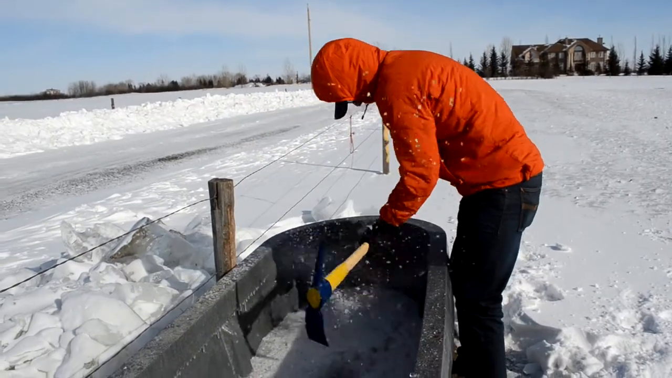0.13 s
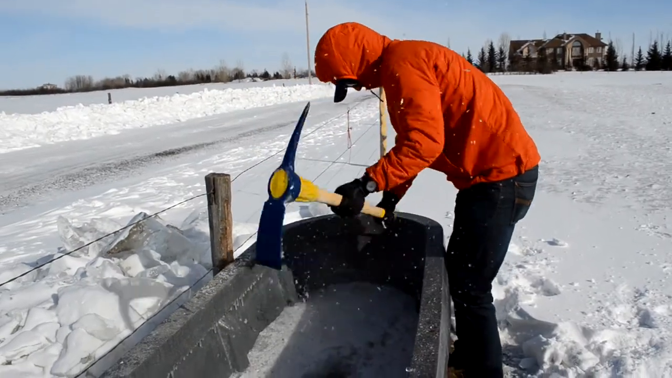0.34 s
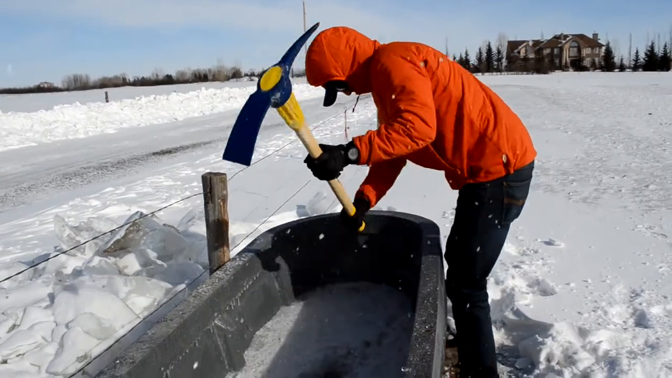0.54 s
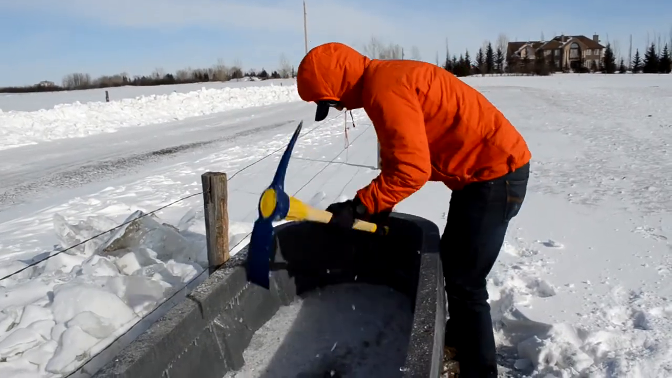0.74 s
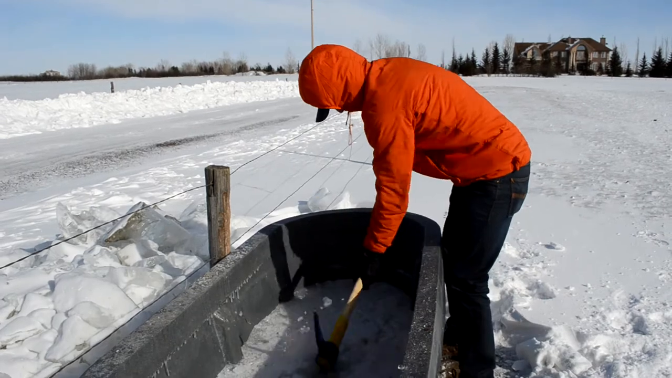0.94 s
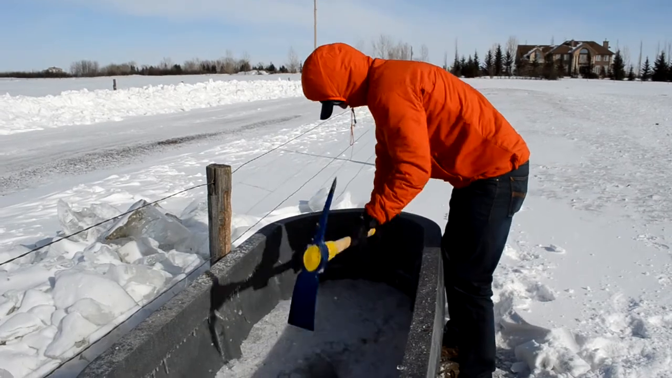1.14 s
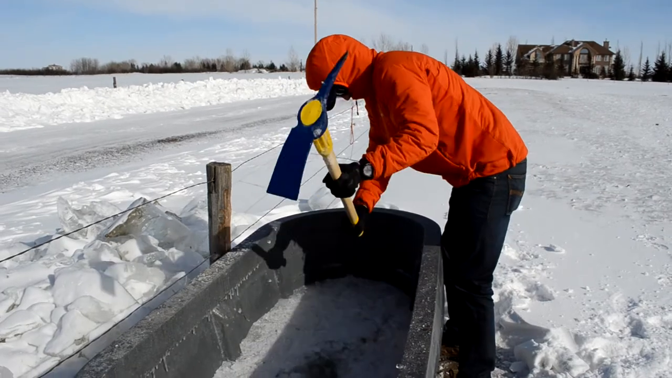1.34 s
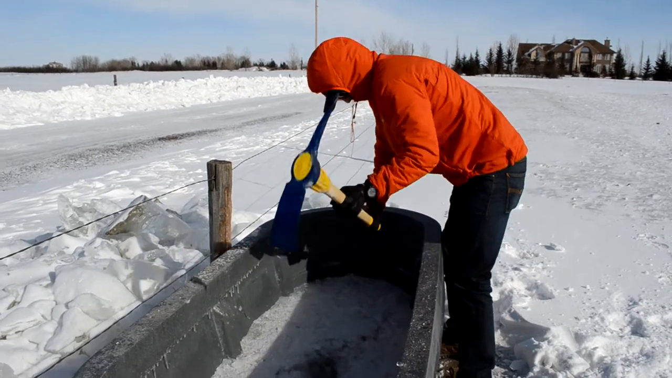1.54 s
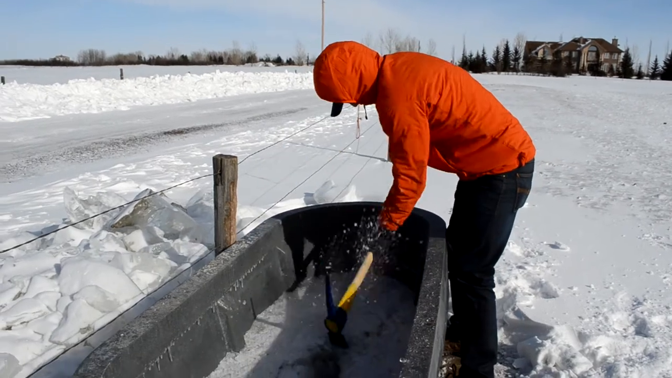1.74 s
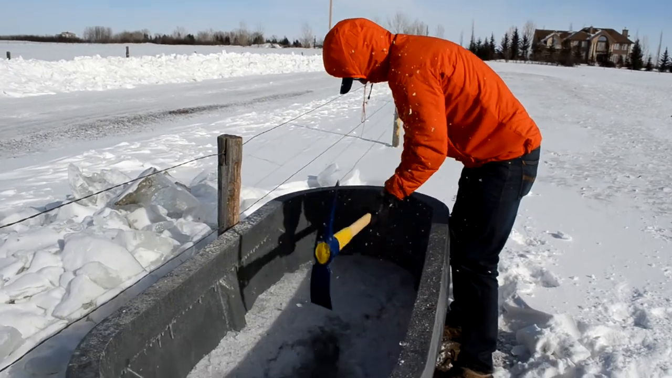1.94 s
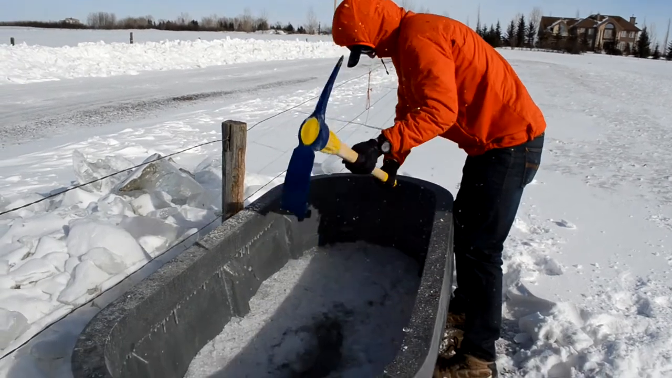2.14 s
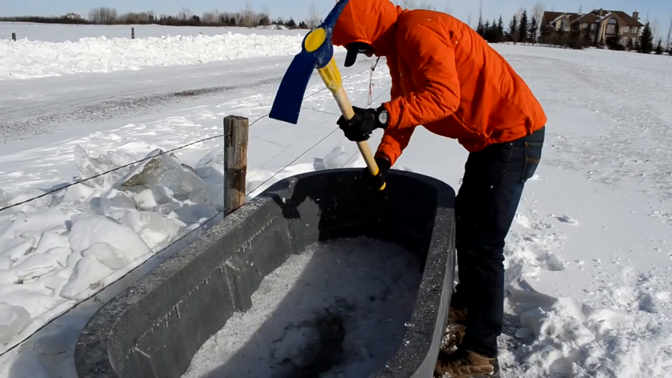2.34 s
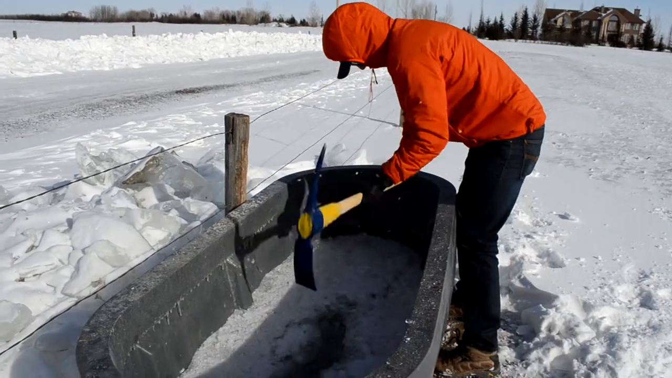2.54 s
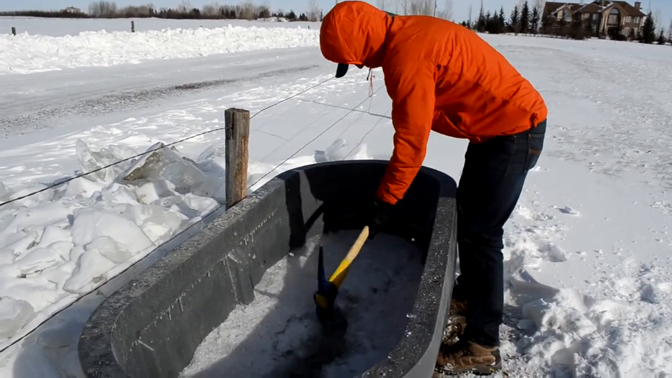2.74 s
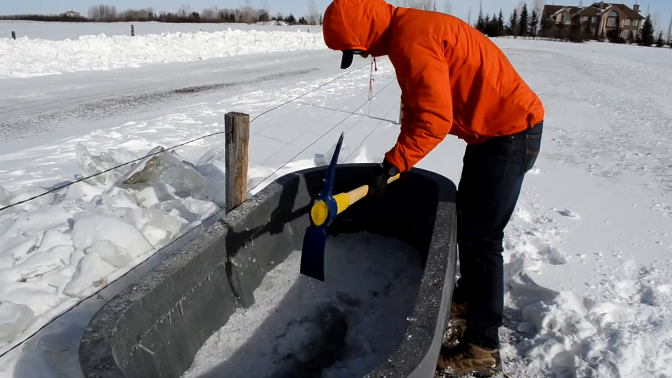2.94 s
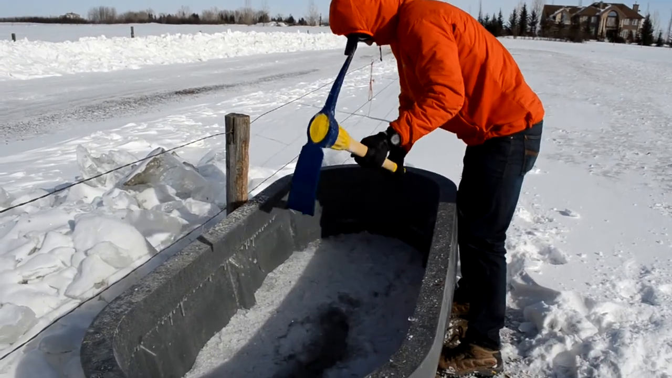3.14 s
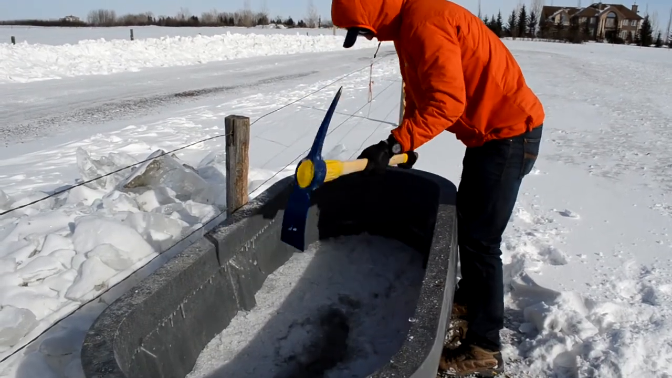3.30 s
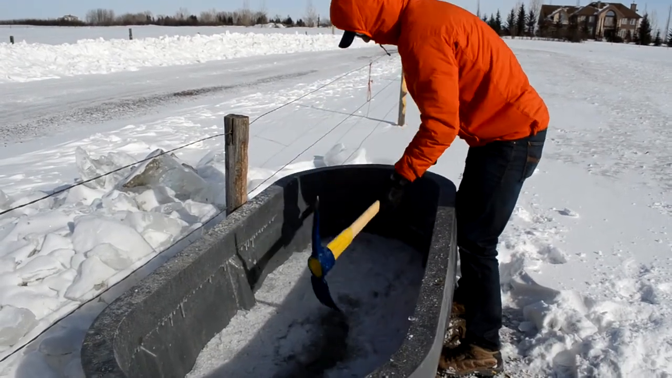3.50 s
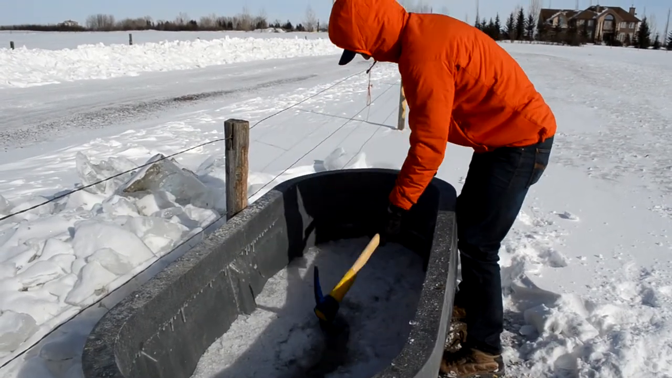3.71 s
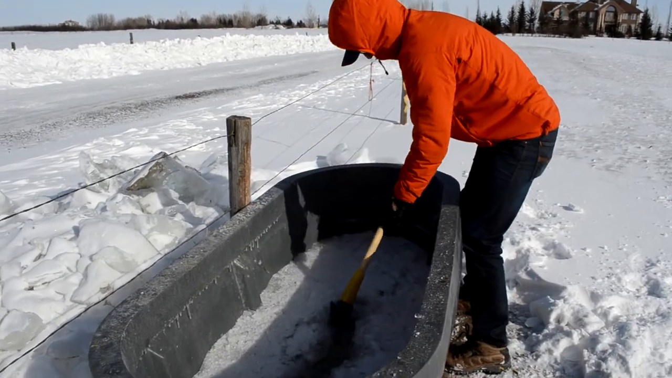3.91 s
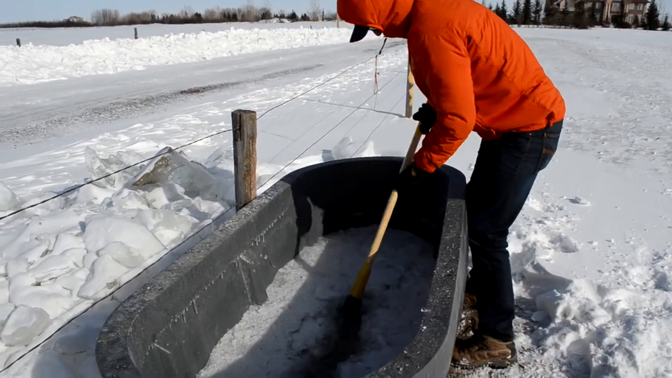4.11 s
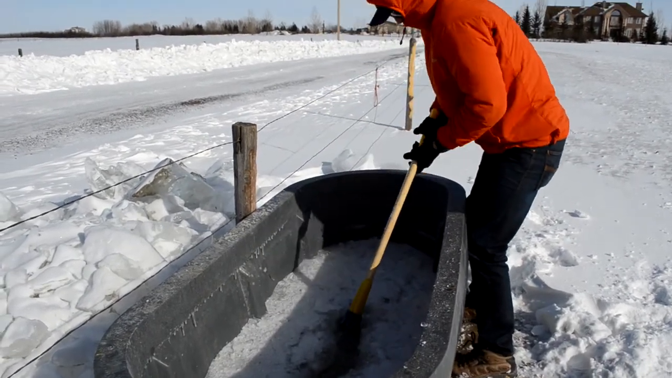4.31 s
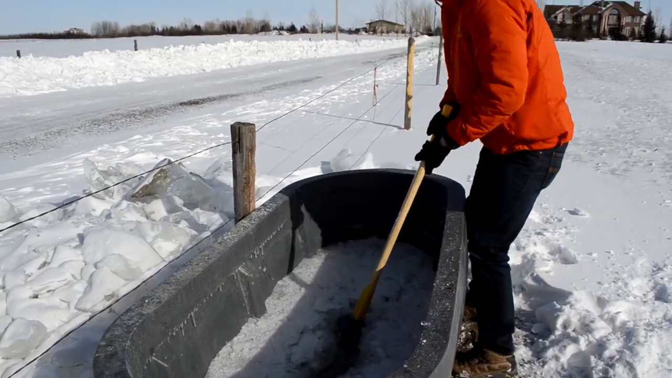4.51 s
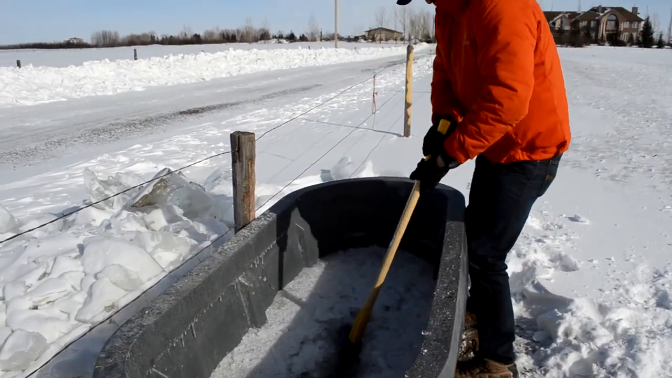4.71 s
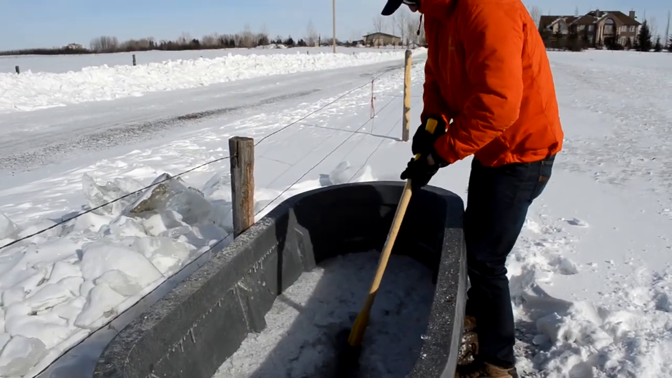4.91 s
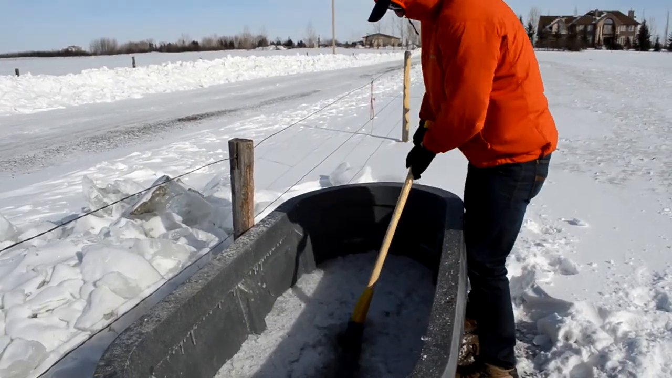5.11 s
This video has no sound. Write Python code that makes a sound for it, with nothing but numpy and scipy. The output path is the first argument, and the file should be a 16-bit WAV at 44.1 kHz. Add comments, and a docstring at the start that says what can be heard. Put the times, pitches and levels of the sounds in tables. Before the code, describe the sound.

A pickaxe cracks thick ice in a hollow plastic trough about once a second, chips scattering, then scrapes through rubble in buffeting wind.

```python
"""Chopping ice in a stock trough

A pickaxe chops thick ice in a plastic trough, outdoors in snow, two metres from the microphone.
Each blow is a run of tiny fractures that rings the slab, thumps the trough and echoes between its walls;
some also ring the steel head. Chunks knock about, chips and spray rain down as filtered bursts of noise,
and at the end the blade is dragged through the rubble with a soft swish, likely a nylon jacket sleeve.
Wind, as uneven low noise, buffets the microphone."""
import sys
import numpy as np
from scipy import signal
from scipy.fft import rfft, irfft
from scipy.io import wavfile

SR = 44100
rng = np.random.default_rng(int(sys.argv[2]) if len(sys.argv) > 2 else 0)


def persist_wave(psi):
    """Save psi, clipped to +-1, as 16-bit WAV."""
    counts = np.round(np.clip(psi, -1, 1) * 32767).astype(np.int16)
    wavfile.write(sys.argv[1], SR, np.atleast_2d(counts).T)


N = 231657
TIME = np.arange(N) / SR  # s, the whole scene
HIT_SIZE = 16384  # samples, the room given to one impact
AGE = np.arange(HIT_SIZE) / SR  # s since an impact

# Blows of the pick and the cracks that follow; levels are relative, slab to hollow and splinter to the crack,
# overtone to the slab: start_s, level_db, crushing_s, slab_hz, slab_db, overtone_db, thump_db, hollow_db,
# splinter_db
BLOWS = [(0.000, -23.5, 0.009, 1090, 3.5, -20, -8, -3, -4.5),
         (0.8932, -12.5, 0.0016, 1560, -5, -2, -10, 1, -5),
         (0.8982, -15, 0.0064, 1576, 8.5, -31, -7, 3, -20),
         (0.9447, -17.5, 0.00075, 1555, 7, -30, 6, 2.5, -28),
         (1.7231, -9, 0.0059, 1220, -2, 24, -11, 3.5, -5),
         (2.6519, -10, 0.0058, 1485, 1, -8.5, -19, 1.5, -11.5),
         (2.667, -21, 0.016, 1230, -9, -20, -11, 5.5, -32),
         (2.684, -11, 0.0005, 1385, 0, -9, -0.5, -1, -16.5),
         (3.648, -18.5, 0.011, 1265, 12.5, -25, 2, -25, -4.5)]
# Spectrum of splintering ice: frequency_hz, relative_level_db
SPLINTER_SPECTRUM = [(500, -36), (2000, 4), (3500, 11.5), (5500, 1), (7500, -3.5), (10000, -11.5),
                     (13000, -25), (16000, -14)]
# Spectrum of a small hard chip landing: frequency_hz, relative_level_db
CHIP_SPECTRUM = [(200, -17), (900, 2), (1800, 7.5), (4000, -9), (7500, -10), (11000, -23.5), (13000, -28),
                 (16000, -32)]
# Spectrum of the deep buffeting at the microphone: frequency_hz, relative_level_db
BUFFET_SPECTRUM = [(10, -46), (25, -22), (50, -3), (90, 1.5), (140, -4.5), (220, -13.5), (400, -44.5),
                   (1500, -66)]
# Spectrum of the higher flutter at the microphone: frequency_hz, relative_level_db
FLUTTER_SPECTRUM = [(50, -20), (130, 0), (200, 1.5), (290, -2.5), (420, -14), (700, -22), (2000, -39.5),
                    (8000, -77)]


def amp(db):
    """Decibels to gain."""
    return 10 ** (np.asarray(db) / 20)


def curves(table):
    """The columns of a control table, one value a sample."""
    s, *columns = np.transpose(table)
    return [np.interp(TIME, s, column) for column in columns]


def unit(x):
    """A steady sound at rms 1."""
    return x / np.sqrt(np.mean(x ** 2))


def unit_hit(x):
    """A short sound with the energy of 10 ms at rms 1."""
    return x / np.sqrt(np.sum(x ** 2) / (SR / 100))


def fade(t60):
    """Free decay by 60 dB in t60 seconds."""
    return np.exp(-np.log(1000) * AGE / max(t60, 1e-3))


def through(x, response):
    """A sound played through an impulse response."""
    return signal.fftconvolve(x, response)[:len(x)]


def colour(x, points, size=4096):
    """Causal, minimum-phase filter with the given spectrum."""
    hz, db = np.transpose(points)
    bins_hz = np.arange(size // 2 + 1) * SR / size
    log_gain = np.log(amp(np.interp(np.log(bins_hz + 1), np.log(hz), db)))
    cepstrum = irfft(log_gain)
    # folding the cepstrum forward puts the energy of the filter as early as it can be
    cepstrum[1:size // 2] *= 2
    cepstrum[size // 2 + 1:] = 0
    return through(x, irfft(np.exp(rfft(cepstrum))))


def ring(modes):
    """Impulse response of a set of damped modes."""
    return sum(amp(db) * fade(t60) * np.sin(2 * np.pi * hz * AGE) for hz, db, t60 in modes)


def fractures(size, rate, spread_db):
    """Tiny snaps at random moments, rate a second on average, their strengths spread unevenly."""
    strength = amp(spread_db * np.minimum(rng.exponential(size=size), 4))
    happens = rng.random(size) < rate / SR
    return happens * strength * rng.choice([-1, 1], size)


def crush(length, rise, release):
    """A run of fractures that builds up, lasts while the ice gives way and dies out."""
    push = (1 - np.exp(-AGE / rise)) * np.exp(-np.maximum(AGE - length, 0) / release)
    return push * fractures(HIT_SIZE, rate=9000, spread_db=2.0)


def hollow(force, t60):
    """Dense reflections between the trough walls, as a decaying tail of noise."""
    hollow_spectrum = [(80, -9.5), (250, -3), (400, -5.5), (520, -2), (690, 0), (1000, -7.5), (1500, -5.5),
                       (2100, -20), (2800, -21), (6000, -45), (16000, -64)]  # the hollow of the trough: frequency_hz, relative_level_db
    walls = rng.standard_normal(HIT_SIZE) * fade(t60)
    return unit_hit(colour(through(force, walls), hollow_spectrum))


def patter(rate, spread_db, t60):
    """Countless tiny impacts, each a short burst of noise."""
    energy = through(fractures(N, rate, spread_db) ** 2, fade(t60) ** 2)
    return unit(np.sqrt(np.abs(energy)) * rng.standard_normal(N))


def tumble(count, spread_db, cycles):
    """Small lumps knocking together at random, each a click of a few cycles at its own pitch."""
    lump_size = 768  # samples
    when, pitch, strength, turn = rng.random((count, 4)).T[:, :, None]
    hz = 300 * 20 ** pitch  # 300 to 6000 Hz
    gain = amp(-spread_db * np.log(np.maximum(strength, .03))) * hz
    turns = hz * AGE[:lump_size]
    decay = np.exp(-np.log(1000) * turns / cycles)  # 60 dB in this many cycles
    lumps = gain * decay * np.sin(2 * np.pi * turns) * np.sign(turn - .5)
    place = (when * N).astype(int) + np.arange(lump_size)
    return unit(np.bincount(place.ravel(), lumps.ravel(), N)[:N])


def swell(s, length, rise, release):
    """A movement that starts at s seconds, gathers speed, lasts for a while and comes to rest."""
    age = np.maximum(TIME - s, 0)
    return (1 - np.exp(-age / rise)) * np.exp(-np.maximum(age - length, 0) / release)


def surge(s, rise, release):
    """A spill that grows to its peak at s seconds and settles."""
    return np.exp(np.minimum((TIME - s) / rise, (s - TIME) / release))


def add(track, s, sound):
    """Mix a sound into the track at s seconds."""
    start = int(np.clip(s * SR, 0, N - 1))
    track[start:start + len(sound)] += sound[:N - start]


def blows():
    """The blade crushes the ice; the same force rings the slab, thumps the trough and echoes in its walls."""
    # low modes of the trough: frequency_hz, relative_level_db, t60_s
    trough_modes = [(149.7, -3.5, 1), (228, -5, 0.078), (253.7, 5, 0.12), (281, 10, 0.07)]
    # spectrum of the cracking ice: frequency_hz, relative_level_db
    crack_spectrum = [(100, -4), (300, 17), (480, -34.5), (750, 0), (1400, 13.5), (2000, 7), (2700, -1),
                      (5000, -37.5), (9000, -56), (12500, -65.5), (16000, -67)]
    out = np.zeros(N)
    for s, db, length, slab_hz, slab_db, overtone_db, thump_db, hollow_db, splinter_db in BLOWS:
        release = 0.0016 + 0.42 * length  # a deeper bite crumbles for longer
        force = crush(length, rise=.0013, release=release)
        crack = unit_hit(colour(force, crack_spectrum))
        slab_modes = [(slab_hz, 0, .018), (1.664 * slab_hz, overtone_db, .025)]
        slab = amp(slab_db) * unit_hit(through(force, ring(slab_modes)))
        thump = amp(thump_db) * unit_hit(through(force, ring(trough_modes)))
        walls = amp(hollow_db) * hollow(force, t60=0.14)
        splintering = crush(length, rise=0.001, release=0.0062)
        splinters = amp(splinter_db) * unit_hit(colour(splintering, SPLINTER_SPECTRUM))
        add(out, s, amp(db) * (crack + slab + thump + walls + splinters))
    return amp(-4.5) * out


def clinks():
    """The pick head rings in its own modes, briefly, before the ice and the handle damp it."""
    # blows that meet hard ice and ring the steel head: start_s, level_db
    hard_hits = [(0.000, -27), (2.654, -36), (3.650, -34)]
    # modes of the steel head: frequency_hz, relative_level_db, t60_s
    steel_modes = [(746, -6, .25), (1168, -4, .2), (2590, 0, .12), (3410, -11, .1), (4160, -7, .1),
                   (4480, -3, .07), (6380, -4, .07), (7590, -15, .13), (9140, -19, .09), (10430, -16, .1)]
    out = np.zeros(N)
    for s, db in hard_hits:
        add(out, s, amp(db) * unit_hit(ring(steel_modes)))
    return out


def chunks():
    """Each big loose lump rattles briefly, rings at its own pitch and sounds the trough."""
    # chunks knocking in the trough, body and treble relative to the level:
    # start_s, level_db, pitch_hz, body_db, treble_db, rattling_s (time constant)
    knocks = [(0.174, -24, 800, -7, -16.5, .005), (0.203, -31.5, 1520, -3.5, -13.5, .004),
              (0.234, -24, 1600, 0, -18.5, .007), (0.307, -26.5, 1850, -7.5, -30, 0.0098),
              (0.35, -20, 770, -11, -34, 0.0046), (0.37, -29, 1630, -4.5, -13, 0.011),
              (0.418, -30, 1160, -3.5, -14, 0.009), (1.033, -8.5, 895, -7, -60, 0.0052),
              (1.039, -13, 1530, -8.5, -48, 0.008), (1.062, -35.5, 1580, 4, -4, 0.017),
              (1.112, -27.5, 940, -20, -19, 0.0045), (1.162, -17.5, 1280, -12.5, -42, 0.0042),
              (1.852, -25.5, 1610, -6.5, -21.5, 0.0097), (1.932, -14, 1610, -12.5, -13, 0.0064),
              (1.95, -22.5, 1520, -19, -14.5, 0.0067), (2.011, -19, 710, -2, -28, .006),
              (2.027, -29.5, 620, 0.5, -40, 0.0071), (2.091, -28, 1550, -4, -8.5, 0.0055),
              (2.798, -18.5, 1450, -7, -15.5, 0.012), (2.834, -24.5, 686, -9, -18, 0.0052),
              (2.914, -15.5, 1290, -11, -19.5, 0.0078), (3.754, -18, 1100, -13.5, -56, 0.006),
              (3.858, -29.5, 1390, -48, -51, 0.0097), (3.882, -34.5, 1400, 2, -4.5, 0.0055),
              (3.914, -15, 840, -2, -33, 0.0038), (3.924, -26, 880, -2.5, -23, 0.019),
              (3.958, -20.5, 1430, -10, -38, 0.0063), (4.486, -25.5, 800, -5, -39, 0.0059),
              (4.506, -15.5, 1520, -13, -54, 0.0059), (4.52, -21, 1520, -3, -18.5, 0.011),
              (4.595, -29.5, 1630, -8, -34, .003), (5.147, -28, 1350, -1, -18.5, 0.01),
              (5.196, -23.5, 1290, -4.5, -20.5, 0.013)]
    # spectrum of the knock: frequency_hz, relative_level_db
    knock_spectrum = [(100, -17), (300, -9), (480, -8), (750, 15), (1000, 19.5), (1400, 23), (2200, 18.5),
                      (3500, 4.5), (7000, -14.5), (11000, -91), (16000, -91)]
    out = np.zeros(N)
    for s, db, hz, body_db, treble_db, rattle in knocks:
        force = crush(0.00092, rise=0.00083, release=rattle)
        knock = amp(-12.0) * unit_hit(colour(force, knock_spectrum))
        tone = amp(-8.5) * unit_hit(through(force, ring([(hz, 0, .018)])))
        body = amp(body_db) * hollow(force, t60=0.15)
        edge = amp(treble_db) * unit_hit(colour(force, SPLINTER_SPECTRUM))
        add(out, s, amp(db) * (knock + tone + body + edge))
    return out


def drag():
    """The blade shoves lumps along and rasps on the slab, with a soft hiss, likely a nylon sleeve swishing."""
    # shoves of the blade, levels relative: start_s, length_s, run_up_s, grinding_db, swish_db
    shoves = [(3.659, 0.049, 0.0069, -39.5, -70), (3.784, 0.29, 0.073, -43, -58),
              (4.108, 0.19, 0.015, -65, -52.5), (4.484, .18, 0.034, -41.5, -60),
              (4.679, .11, 0.032, -46.5, -54.5), (5.033, 0.15, 0.054, -43, -53.5)]
    # spectrum of grinding lumps: frequency_hz, relative_level_db
    grind_spectrum = [(150, -2.5), (450, -6.5), (720, -2), (1000, -10.5), (1450, -10.5), (2100, -11.5),
                      (3200, -30), (6000, -44), (12000, -52)]
    # spectrum of the soft swish: frequency_hz, relative_level_db
    swish_spectrum = [(1000, 8.5), (3200, 5.5), (5000, -5.5), (7200, -8.5), (8500, -19), (12000, -24),
                      (16000, -54)]
    grinding, swish = 0, 0
    for s, length, rise, grind_db, swish_db in shoves:
        speed = swell(s, length, rise, release=0.044)  # each shove comes to rest quickly
        grinding = grinding + amp(grind_db) * speed
        swish = swish + amp(swish_db) * speed
    lumps = tumble(count=5000, spread_db=3.5, cycles=10)
    rasp = patter(rate=500, spread_db=3.8, t60=.02)
    grind = unit(colour(lumps + amp(-5.0) * rasp, grind_spectrum))
    slab = unit(through(rasp, ring([(1434, 0, 0.0096)])))
    hiss = unit(colour(patter(rate=2600, spread_db=-0.5, t60=0.014), swish_spectrum))
    return grinding * (amp(2) * grind + amp(-0.5) * slab) + amp(3) * swish * hiss


def rubble():
    """Each scoop spills broken ice back into the trough; fine spray and stray chips patter down after it."""
    # the blade is wrenched about and throws up debris, levels relative:
    # start_s (peak of the spill), rubble_db, spray_db, build_up_s, shower_db, shower_length_s
    scoops = [(0.07, -37, -58, 0.028, -58.5, 0.31), (0.36, -44, -48.5, 0.07, -59, 0.67),
              (1.04, -35, -55.5, 0.1, -56, 0.33), (1.89, -30, -42.5, 0.052, -61.5, 0.74),
              (2.80, -39, -47.5, 0.065, -61.5, 0.33)]
    # spectrum of coarse broken ice: frequency_hz, relative_level_db
    grit_spectrum = [(150, -11), (420, 2), (700, 7.5), (1000, -1), (1500, 6), (2200, -3), (3500, -15.5),
                     (6000, -34.5), (12000, -74.5)]
    # spectrum of fine ice spray: frequency_hz, relative_level_db
    spray_spectrum = [(1000, -1.5), (3000, 0), (5000, -8), (7500, -7), (9500, -16), (12500, -16),
                      (14000, -27), (16000, -36.5)]
    spill, mist, shower = 0, 0, 0
    for s, grit_db, spray_db, rise, shower_db, length in scoops:
        # most of the debris drops straight back
        spill = spill + amp(grit_db) * surge(s, rise, release=0.078)
        mist = mist + amp(spray_db) * surge(s, rise, release=0.087)
        # the rest flies high and showers down
        shower = shower + amp(shower_db) * swell(s, length, rise=0.064, release=0.065)
    # crumbs are shaken loose by each blow
    crumbs = sum(amp(db) * swell(s, 0, rise=.006, release=0.099) for s, db, *_ in BLOWS)
    lumps = tumble(count=4000, spread_db=4, cycles=10)
    crackle = patter(rate=400, spread_db=5, t60=0.025)
    grit = unit(colour(lumps + amp(8.5) * crackle, grit_spectrum))
    spray = unit(colour(patter(rate=700, spread_db=4, t60=0.018), spray_spectrum))
    strays = unit(colour(patter(rate=90, spread_db=3.5, t60=.014), CHIP_SPECTRUM))
    coarse = spill + amp(6) * shower + amp(-40.5) * crumbs
    return coarse * grit + (mist + shower) * (spray + amp(2.5) * strays)


def chips():
    """Small hard splinters tick as they land, each a very short run of fractures."""
    # the biggest single chips landing: start_s, relative_level_db
    landings = [(0.3384, -25), (0.597, -25.5), (0.74, -26.5), (0.867, -20), (1.3561, -23), (1.396, -26.5),
                (2.1813, -25.5), (2.2131, -25), (2.2664, -27.5), (2.3007, -23.5), (2.522, -31.5),
                (2.6221, -24), (3.0044, -28), (3.234, -34.5), (3.638, -20), (4.854, -31.5)]
    out = np.zeros(N)
    for s, db in landings:
        force = crush(.0004, rise=.0002, release=.003)
        add(out, s, amp(db) * unit_hit(colour(force, CHIP_SPECTRUM)))
    return amp(-17) * out


def taps():
    """One short push on wood: a brief ring in two modes and a click."""
    # light, dull taps, probably the pick head shifting on its handle: start_s, level_db, pitch_hz
    shifts = [(2.374, -43, 875), (3.389, -36, 715), (3.528, -37.5, 790), (3.626, -35, 1070),
              (4.898, -42, 1340)]
    out = np.zeros(N)
    for s, db, hz in shifts:
        force = crush(.0004, rise=.0002, release=.0012)
        wood = unit_hit(through(force, ring([(hz, 0, .016), (1.77 * hz, -5, .01)])))
        click = amp(-22) * unit_hit(colour(force, CHIP_SPECTRUM))
        add(out, s, amp(db) * (wood + click))
    return out


def puffs():
    """A single eddy bumps softly against the microphone: a quick push and a slower heave."""
    # sudden puffs of wind: start_s, relative_level_db
    bumps = [(0.27, -17), (0.375, -21.5), (0.553, -21), (0.656, -19), (0.681, -18.5), (1.483, -29),
             (1.537, -25.5), (1.608, -28), (2.385, -28.5), (3.263, -24), (4.276, -23), (4.347, -22),
             (4.442, -19), (4.786, -25), (4.885, -25), (4.932, -20.5)]
    out = np.zeros(N)
    for s, db in bumps:
        push = unit_hit(colour(crush(.008, rise=.004, release=.006), FLUTTER_SPECTRUM))
        heave = unit_hit(colour(crush(.02, rise=.008, release=.01), BUFFET_SPECTRUM))
        add(out, s, amp(db) * (push + amp(-1.5) * heave))
    return amp(-7.0) * out


def wind():
    """Eddies push on the microphone, coming in quick flurries, over the faint rush of open air."""
    # strength of the wind at the microphone: start_s, buffeting_db, flutter_db
    strength = [(0.0, -36, -40), (0.1, -42.5, -42.5), (0.28, -29, -34), (0.48, -39.5, -40.0),
                (0.66, -31, -32.5), (0.85, -40.5, -37), (1.28, -42, -46.5), (1.55, -32.5, -42),
                (1.95, -38, -39.5), (2.26, -42, -48), (2.5, -41.5, -44.5), (2.9, -35, -39.5),
                (3.2, -37.5, -43.5), (3.46, -35, -36), (3.75, -36, -42.5), (4.0, -33, -36),
                (4.9, -34.5, -33), (5.25, -37.5, -34.5)]
    # spectrum of the open air: frequency_hz, relative_level_db
    air_spectrum = [(30, 5), (150, -3), (400, -8), (1400, -13), (3000, -25.5), (7000, -42), (12000, -72),
                    (16000, -42.5)]
    buffet_db, flutter_db = curves(strength)
    slow = signal.butter(2, 22, fs=SR, output="sos")  # flurries up to about 22 a second
    eddies = unit(signal.sosfilt(slow, rng.standard_normal(N)))
    # the same eddies swing both layers, by these dB
    buffet = unit(colour(rng.standard_normal(N), BUFFET_SPECTRUM) * amp(1.54 * eddies))
    flutter = unit(colour(rng.standard_normal(N), FLUTTER_SPECTRUM) * amp(3.5 * eddies))
    air = unit(colour(rng.standard_normal(N), air_spectrum))
    return amp(buffet_db) * buffet + amp(flutter_db) * flutter + amp(-47) * air


def scene():
    """Open snow gives no echo: only the trough colours the sounds."""
    ice = blows() + clinks() + chunks() + drag() + rubble() + chips() + taps()
    return (ice + puffs() + wind())[None]


def record(dry):
    """The microphone sheds the deepest rumble and the finest hiss; peaks are clipped at full scale."""
    thinned = signal.sosfilt(signal.butter(1, 20, "high", fs=SR, output="sos"), dry)
    softened = signal.sosfilt(signal.butter(2, 13000, fs=SR, output="sos"), thinned)
    clipped = np.clip(softened, -1, 1)
    # steep upper limit at 15.5 kHz
    return signal.sosfilt(signal.ellip(8, .2, 70, 15500, fs=SR, output="sos"), clipped)


dry = scene()
out = record(dry)
persist_wave(out)
```